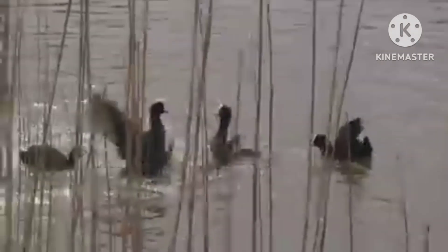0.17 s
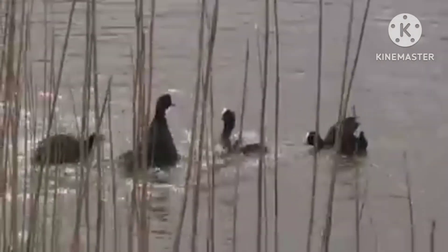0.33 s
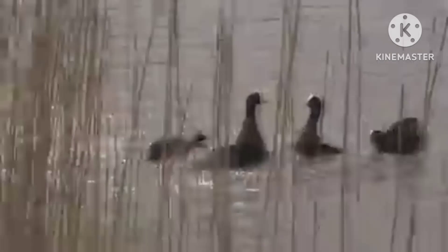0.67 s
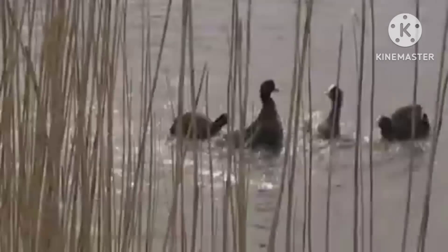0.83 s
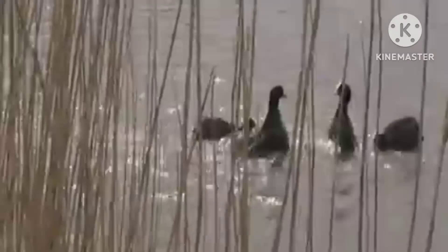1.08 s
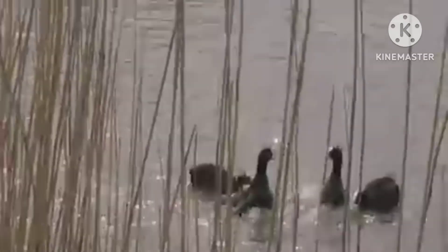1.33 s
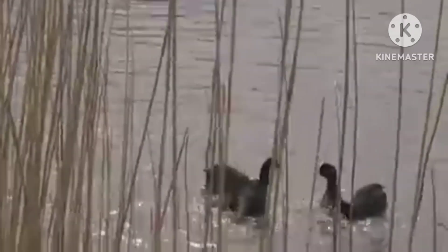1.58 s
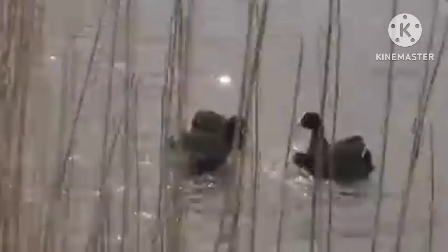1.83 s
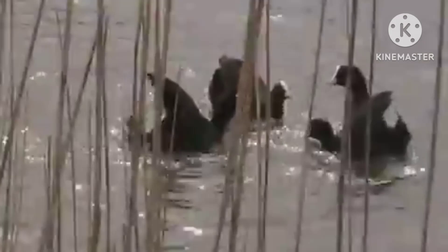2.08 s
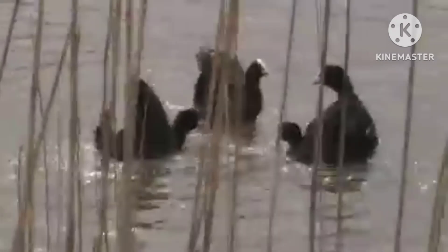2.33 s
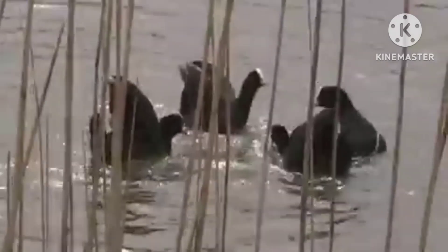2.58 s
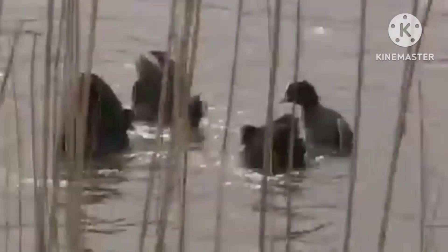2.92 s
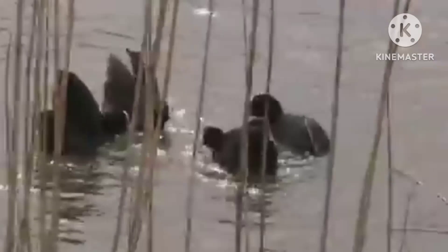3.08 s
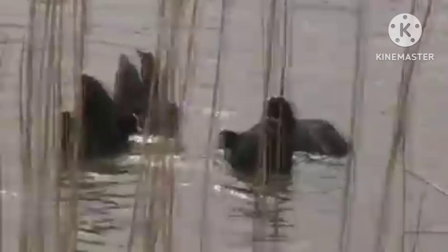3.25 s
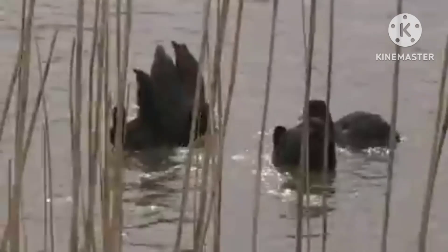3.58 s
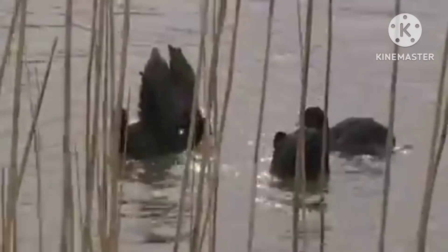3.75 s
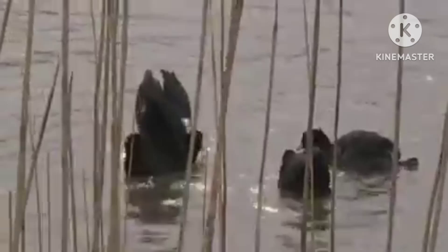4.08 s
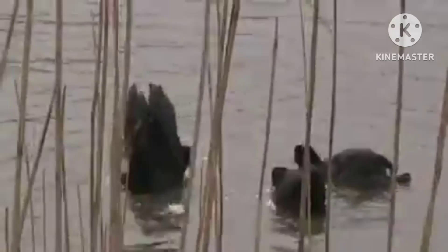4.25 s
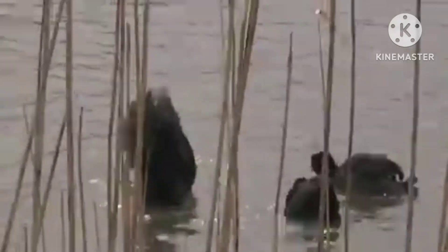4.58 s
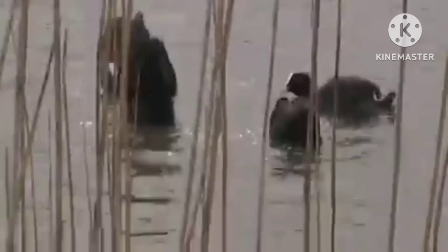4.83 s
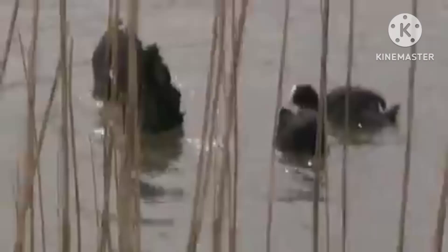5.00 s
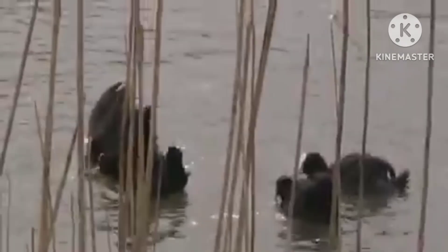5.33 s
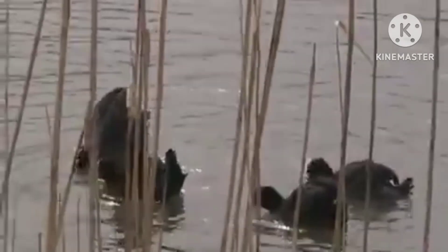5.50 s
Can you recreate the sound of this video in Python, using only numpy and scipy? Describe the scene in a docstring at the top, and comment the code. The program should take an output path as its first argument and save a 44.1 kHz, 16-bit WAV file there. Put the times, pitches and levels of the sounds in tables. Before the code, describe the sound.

Water splashes and trickles for the first second and a half, then mostly settles to a faint hiss. Over it, a piercing bird barks short falling notes, answered by a quieter clear-toned bird and, from the middle on, a rough, catching one. Calls become closer and nearly overlap. Dull far-off rumble and soft wind thumps continue. Open lake, birds fairly close and dry, only a tiny scatter from reeds, background ducking under loud calls.

```python
"""Water stirs and plops over a low distant rumble and lumpy wind; then three coots quarrel behind reeds.
A shrill bird, a stuttering one and a mellow one give short falling calls, built from wavering overtones.
Splashes are short noise bursts, tiny drops are fading tones, and rumble and wind are drifting noise.
Gain control turns everything down with loud calls, so the background dips and soon returns."""
import sys
import numpy as np
from scipy import signal
from scipy.fft import rfft, irfft, next_fast_len
from scipy.io import wavfile
from scipy.ndimage import uniform_filter1d

SR = 44100
rng = np.random.default_rng(int(sys.argv[2]) if len(sys.argv) > 2 else 0)


def ratio(d):
    """dB to gain"""
    e = np.asarray(d, float) / 20
    return 10 ** e


def wav_out(sig):
    """Save sig, one row per channel (or a flat mono array), as 16-bit PCM at SR to the path in sys.argv[1]."""
    wavfile.write(sys.argv[1], SR, np.round(np.clip(np.atleast_2d(sig).T, -1, 1) * 32767).astype(np.int16))


N = 249165  # length in samples

# Colour of the distant rumble: pitch_hz, relative_level_db
RUMBLE_COLOUR = [(88, -60), (150, 1), (270, 6), (674, -7), (779, -2.5), (1340, -12), (1500, -11.5),
                 (1950, -57), (3300, -120)]
# Loudness of the rumble over time: time_s, level_db
RUMBLE_LEVEL = [(0.0, -46.5), (0.93, -39.5), (0.99, -42), (1.23, -38), (2.14, -45), (2.9, -44), (3.6, -44),
                (4.15, -39), (4.7, -40), (5.4, -36), (5.65, -40.5)]
# Wavering bands in the rumble: centre_hz, width_hz, level_db on the scale of the rumble colour
WAVERING_BANDS = [(269.1, 64.5, 10.5), (432.9, 50.6, 5.5)]
# Loudness of the wind over time: time_s, level_db
WIND_LEVEL = [(0.0, -39.5), (1.08, -52.5), (1.68, -44), (1.76, -54.5), (1.93, -34.5), (2.11, -49.5),
              (4.03, -50), (4.31, -41.5), (4.47, -50), (4.56, -33), (5.15, -45.5), (5.57, -39.5),
              (5.65, -24)]
# How alike left and right are in rumble and water: pitch_hz, likeness (-1 to 1)
LIKENESS = [(30, 0.96), (60, 0.9), (130, 1), (240, 1), (500, 0.752), (950, -0.052), (3770, -0.445),
            (15000, 0.18)]
# Colour of the calm lake's hiss: pitch_hz, relative_level_db
CALM_COLOUR = [(350, -38.5), (600, -9), (1470, -17), (2180, -11.5), (2370, -16), (3160, -17.5),
               (13200, -29), (16000, -40.5)]
CALM_DB = -51.5
# Colour of the stirred water and its drops: pitch_hz, relative_level_db
WATER_COLOUR = [(380, -34.5), (650, 1), (1100, -7.5), (1600, 1), (2590, -4), (12200, -16.5), (15200, -14),
                (16000, -58)]
# Stirred water, loudest at first, dying away by 1.75 s with a brief return near 1.4 s: time_s, level_db
STIR_LEVEL = [(0.0, -43), (0.326, -45), (0.798, -48.5), (0.978, -59.5), (1.364, -47.5), (1.534, -56.5),
              (1.75, -88)]
# Short noise bursts: splashes, drops, and two voice clicks just before a call (3.046 and 3.056 s):
# time_s (begins 1 ms sooner), level_db before the fade, centre_hz, fade_s (time to fall 60 dB),
# half_width_octaves
SHORT_BURSTS = [(0.133, -26, 700, 0.032, 0.62), (0.143, -22, 706, 0.05, 0.68),
                (0.153, -26, 2320, 0.0423, 0.85), (0.402, -22.5, 1700, 0.029, 1.63),
                (0.409, -26, 1600, 0.066, 1.81), (0.0205, -34.5, 4010, 0.022, 1.8),
                (0.4844, -30, 3800, 0.026, 1.1), (0.747, -21.5, 2770, 0.0231, 1.49),
                (1.085, -37.5, 3850, 0.048, 4.8), (1.1927, -38.5, 2800, 0.0206, 3.2),
                (1.288, -37.5, 3150, 0.0415, 1.22), (1.5255, -27.5, 8730, 0.0295, 11.7),
                (2.319, -36.5, 7800, 0.0255, 1.05), (2.6679, -27, 3030, 0.0284, 10),
                (3.646, -37.5, 5230, 0.0212, 1.05), (3.7193, -37.5, 8097, 0.0126, 1.3),
                (4.786, -34.5, 6770, 0.0204, 0.33), (1.106, -39.5, 929, 0.017, 0.94),
                (1.145, -32.5, 886, 0.029, 1.34), (1.441, -36, 813, 0.0172, 0.94),
                (2.078, -23, 1930, 0.0273, 0.79), (2.093, -18, 1770, 0.0245, 0.613),
                (2.353, -33, 781, 0.0219, 0.46), (2.871, -33.5, 2090, 0.0248, 0.44),
                (3.046, -29.5, 1790, 0.0365, 0.45), (3.056, -30, 2927, 0.099, 0.52)]

# Calls of the shrill bird: start_s, length_s, effort_db, head_hz, last_hz
SHRILL_CALLS = [(0.361, .06, -16, 1037, 971.4), (0.955, 0.0861, -6, 1144, 985.3),
                (1.731, 0.1007, -4.5, 1158, 977.6), (2.455, 0.0959, -6, 1142, 944.8),
                (3.066, .095, -5, 1088, 909), (3.7994, .12, -4.5, 1145, 888.7),
                (4.425, 0.0924, -6.5, 1080, 911.2), (5.138, 0.0937, -7.5, 1072, 910.2)]
# Calls of the stuttering bird: start_s, length_s, effort_db, head_hz, last_hz
STUTTERING_CALLS = [(2.778, .045, -19.5, 912, 888.7), (3.341, 0.0672, -18, 952.6, 904.8),
                    (4.366, .068, -17.5, 946, 873.3), (4.885, 0.0771, -13, 1021, 876.3),
                    (5.358, 0.0762, -15, 954.6, 863.1)]
# Calls of the mellow bird: start_s, length_s, effort_db, head_hz, widest_beak (0 to 1)
MELLOW_CALLS = [(0.416, 0.0382, -34.5, 767.5, 0.25), (1.308, 0.0673, -13.5, 803.9, 0.5),
                (2.116, 0.054, -31, 769.2, 0.28), (2.659, 0.0664, -29, 772.6, 0.34),
                (3.4, 0.0748, -25.5, 793.1, 0.49), (3.966, 0.0474, -38.5, 765.4, 0.34),
                (4.308, .077, -22.5, 812.4, 0.85), (4.748, 0.0375, -42, 771, 0.7),
                (5.292, 0.087, -21.5, 816.8, 0.78)]
# A whistle-like note, a low grunt and a low plop: start_s, length_s, effort_db, first_hz, last_hz
ODD_NOTES = [(0.466, 0.0537, -24, 1343, 1261), (0.775, .075, -29, 331.8, 263.7),
             (2.352, 0.0215, -31, 358, 378)]
# Moments where a voice catches: time_s, depth_db (before the overtone weighting; negative swells),
# pitch_bend (share of the pitch)
CATCHES = [(0.3681, 18, 0.016), (0.384, 1.5, 0.031), (0.9651, 3.5, -0.078), (0.969, -6, 0.068),
           (0.981, 2.5, 0.038), (1.742, 5.5, -0.0756), (1.746, 2.5, 0.0575), (1.757, -1, 0.0496),
           (2.4646, 3, -0.112), (2.469, 0.5, 0.056), (2.788, 8.5, 0.139), (2.801, 4, 0.146),
           (2.8053, 9, 0.029), (3.0752, 9, -0.11), (3.079, 4.5, 0.071), (3.09, -2, 0.0225),
           (3.352, 15, 0.051), (3.361, 12, 0.119), (3.372, 5, 0.228), (3.383, 11, 0.109), (3.392, 8, 0.028),
           (3.8108, 7.5, -0.098), (3.8165, 4.5, 0.071), (3.846, 9, -0.021), (3.858, 0, 0.05),
           (3.866, -2.5, 0.114), (3.8747, 0.5, 0.0603), (3.894, 5, 0.0165), (4.3747, 11.5, 0.074),
           (4.384, 10.5, 0.072), (4.394, 5, 0.169), (4.407, 2, 0.047), (4.434, 20, -0.072),
           (4.4463, 5, 0.078), (4.4605, 5, 0.017), (4.8963, 9, 0.115), (4.907, 4, 0.14), (4.92, 1, 0.14),
           (4.931, 4, 0.0585), (5.149, 5, -0.114), (5.164, -0.5, 0.054), (5.175, -1.5, 0.026),
           (5.3662, 10.5, 0.063), (5.377, 8, 0.169), (5.386, 4.5, 0.182), (5.398, 4, 0.158)]
# Sound colours, beak open, shut, or for the odd notes: pitch_hz, relative_level_db
SHRILL_OPEN = [(900, -21.5), (1250, -13), (2300, -1), (3500, 4), (4600, -2), (5700, -8), (6900, 0),
               (8100, -8.5), (10000, -16.5), (14000, -36.5)]
STUTTERING_OPEN = [(800, -13.5), (2000, 0), (3000, 8.5), (4000, -2), (5300, -19), (7000, -16),
                   (10000, -24.5), (14000, -41)]
MELLOW_OPEN = [(700, -25), (1550, 3.5), (2400, -16), (3200, -10), (4000, -9.5), (5500, -22), (7000, -19.5),
               (10000, -30.5), (14000, -65)]
SHUT = [(300, -41), (1000, 13.5), (2000, -10.5), (3000, -27.5), (4000, -33), (5000, -47), (6500, -30),
        (9000, -36), (14000, -34)]  # shared by the shrill and stuttering birds
MELLOW_SHUT = [(700, 5), (1550, -5), (2400, -8), (3200, -27.5), (4000, -28), (5500, -58.5), (7000, -39.5),
               (10000, -47)]
WHISTLE_COLOUR = [(1300, 6.5), (2600, -13.5), (3900, -18), (5200, -30.5)]
LOW_COLOUR = [(300, 7), (600, -9), (900, -30.5), (1500, -81)]  # shared by the grunt and the plop
# Course of one call: length_share (0 to 1), effort_db, beak (0 to 1)
SHRILL_SHAPE = [(0, -39, .6), (.03, -19.5, .7), (0.056, -3, 0.91), (.2, -1, 0.89), (.37, -4.5, 0.86),
                (.47, -10.5, 0.6), (.63, -12.5, 0.4), (.82, -17, 0.33), (0.999, -51.5, 0.37)]  # loud head, quiet tail
STUTTERING_SHAPE = [(0, -40.5, 0.29), (.05, -0.5, 0.79), (.3, 0, 0.73), (.5, -1.5, 0.74), (.7, -4.5, .35),
                    (.875, -12.5, 0.26), (0.998, -39.5, 0.43)]
ODD_SHAPE = [(0, -25.5, 0.25), (.4, 0, 0.45), (1, -15.5, .5)]
# Course of one mellow call: length_share (0 to 1), effort_db, share_of_widest_beak (0 to 1)
MELLOW_SHAPE = [(0, -31.5, 0.92), (.09, -3, 0.93), (.45, 0, .85), (.8, -7, .62), (1, -41, 0.68)]
# Front sounds, left over right: pitch_hz, difference_db
LEAN = [(700, 2.5), (2500, 1.5), (5000, -2.5), (8000, -1.5), (12000, 0.5)]
# Front sounds, how far left lags behind right: pitch_hz, lag_radians
LAG = [(700, 0.101), (3000, 0.803), (6000, 1.324), (10000, 0.787), (14000, 1.87)]

# Pitch corners as shares of a call's length; BREAK_HZ is where each shrill call breaks down to
BREAK_FROM, BREAK_TO, BREAK_LANDS, BREAK_HZ = .36, .5, .86, 1017.5
STUTTER_FALLS, STUTTER_LANDS = 0.3726, .72
MELLOW_FALLS, MELLOW_LANDS = 0.1371, 0.98
MELLOW_HOLD_S, SAG_HZ_PER_S = 0.0321, 2235  # the fall grows with the length beyond the hold
FLICK_S, SNAP_S = 0.0029, 0.001626  # pitch slides off, then snaps back
TAIL_FOLLOWS, FULL_DB = 0.465, -6  # the tail follows the head's distance from full effort by this share
RASP, RAGGED = 3.05, 1.2  # extra air noise in the first burst, and as the beak shuts


def evened(x):
    """Scales to rms 1."""
    return x / np.sqrt(np.mean(x ** 2) + 1e-20)


def read(points, hz):
    """Reads a spectrum on a log-frequency axis."""
    f, value = np.transpose(points)
    return np.interp(np.log(hz + 1), np.log(f + 1), value)


def curve(rows):
    """Turns a level curve in dB into a gain for every sample."""
    s, db = np.transpose(rows)
    return ratio(np.interp(np.arange(N) / SR, s, db))


def add(mix, s, sound):
    """Mixes a sound in at s seconds."""
    part = mix[round(s * SR):][:len(sound)]
    part += sound[:len(part)]


def drift(shape, size):
    """Slow random motion of rms 1, smooth over size samples."""
    once = uniform_filter1d(rng.standard_normal(shape), size)
    return evened(uniform_filter1d(once, size))


def coloured(x, gain):
    """Filters x by a complex gain for each frequency."""
    size = next_fast_len(N)
    hz = np.fft.rfftfreq(size, 1 / SR)
    return irfft(rfft(x, size) * gain(hz), size)[..., :N]


def wash(gain, likeness, patchy_db):
    """Two-channel noise of a given colour, with patches drifting over time and frequency."""
    frames, hz = N // 256 + 5, np.fft.rfftfreq(1024, 1 / SR)[:, None]
    a, b, c, d, patches = rng.standard_normal((frames, 513, 5)).T
    patches = uniform_filter1d(patches, size=24, axis=0)  # over frequency
    patches = evened(uniform_filter1d(patches, size=5, axis=1))  # over time
    same = np.clip(likeness(hz), -1, 1)
    left = a + 1j * b
    right = same * left + np.sqrt(1 - same ** 2) * (c + 1j * d)
    z = np.array([left, right]) * gain(hz, frames) * ratio(patchy_db * patches)
    return evened(signal.istft(z, nperseg=1024, noverlap=768)[1][:, :N])


def rumble():
    """Distant low noise with two bands that waver in pitch."""
    def colour(hz, frames):
        """The broad wash plus the moving bands."""
        total = ratio(read(RUMBLE_COLOUR, hz))
        for centre_hz, width_hz, db in WAVERING_BANDS:
            moving_hz = centre_hz * (1 + 0.0955 * drift(frames, size=12))
            total = total + ratio(db) / (1 + ((hz - moving_hz) / (width_hz / 2)) ** 2)
        return total
    return curve(RUMBLE_LEVEL) * wash(colour, lambda hz: read(LIKENESS, hz), patchy_db=1.0)


def wind():
    """Lumpy low buffeting of wind on the microphone, partly unlike at its two ports."""
    def colour(hz, frames):
        """One low hump round 95 Hz."""
        return 1 / (1 + (np.log2((hz + 1) / 95) / 0.456) ** 4)

    def likeness(hz):
        """Left and right differ most near 160 Hz."""
        return .97 - .8 * np.exp(-((hz - 160) / 50) ** 2)
    lumps = ratio(2 * drift(N, size=900))
    return curve(WIND_LEVEL) * lumps * wash(colour, likeness, patchy_db=1.5)


def water():
    """Calm hiss of the lake, under stirred noise and fading drop tones that are loudest at first."""
    t, crackle = np.arange(300) / SR, np.zeros((2, N))
    for hz in np.geomspace(800, 9000, num=14):
        chance = rng.random((2, N)) * SR / 30  # below 1 about 30 times a second
        drops = (chance < 1) * np.clip(chance, .05, 1) ** -.46  # many small, few large
        ring = np.sin(2 * np.pi * hz * t) * np.exp(-t * hz / 6.5)
        drop = ratio(read(WATER_COLOUR, hz)) * ring * hz ** 0.984
        both_sides = drops + 0.6 * drops[::-1]
        crackle += signal.oaconvolve(both_sides, drop[None], axes=1)[:, :N]
    likeness = lambda hz: read(LIKENESS, hz)
    stirred = wash(lambda hz, frames: ratio(read(WATER_COLOUR, hz)), likeness, patchy_db=4.5)
    calm = wash(lambda hz, frames: ratio(read(CALM_COLOUR, hz)), likeness, patchy_db=1.18)
    return curve(STIR_LEVEL) * (stirred + ratio(-5.0) * evened(crackle)) + ratio(CALM_DB) * calm


def short_bursts():
    """Splashes, drops and two voice clicks: short noises, each with its own centre and fade."""
    mix, t, hz = np.zeros(N), np.arange(4096) / SR, np.fft.rfftfreq(4096, 1 / SR)
    for s, db, centre_hz, fade_s, octaves in SHORT_BURSTS:
        noise = rng.standard_normal(4096)
        hump = 1 / (1 + (np.log2((hz + 1) / centre_hz) / max(octaves, .05)) ** 2)
        low_cut = 1 / (1 + (450 / (hz + 1)) ** 4)
        burst = evened(irfft(rfft(noise) * hump * low_cut))
        burst *= (1 - np.exp(-t / 0.000403)) * ratio(-60 * t / max(fade_s, .003))
        add(mix, s - .001, ratio(db) * burst)
    return mix


def phrase(start, length, effort_db, shape, bends, pitches, beak=1, lift_db=0):
    """Stretches a shape over one call: rows of time_s, pitch_hz, effort_db, beak (0 to 1)."""
    share, db, opening = np.transpose(shape)
    at = np.union1d(share, bends)
    effort = effort_db + np.interp(at, share, db)
    effort += np.interp(at, bends[:2], [0, lift_db])  # shifts the tail only
    pitch = np.interp(at, bends, pitches)
    width = np.clip(beak * np.interp(at, share, opening), 0, 1)
    return np.transpose([start + length * at, pitch, effort, width])


def call(rows, throat, shut, jitter, breath_db):
    """A voice of 14 harmonics, rough at its start, whose colour changes as the beak shuts."""
    s, *columns = np.transpose(rows)
    t = np.arange(s[0], s[-1], 1 / SR)
    age = t - s[0]
    columns[1] = ratio(columns[1] / 2)  # air pressure moves in straight lines, the sound goes with its square
    hz, pressure, beak = (np.interp(t, s, c) for c in columns)

    at, depth_db, bend = (c[:, None] for c in np.transpose(CATCHES))
    away = (t - at) / (0.001105 + .00008 * depth_db)  # deeper catches last longer
    dip = np.exp(-np.where(away < 0, away ** 2, away ** 4))  # the voice fades out, then snaps back
    catch_db = (depth_db * dip).sum(0)
    flick = (bend * np.exp(-((t - at) / np.where(t < at, FLICK_S, SNAP_S)) ** 2)).sum(0)

    burst = np.exp(-age / 0.01264)  # the air bursts out sharp and unsteady
    wobble = jitter * (beak + 2.006 * burst) * drift(len(t), size=40)
    turns = np.cumsum(hz * (1 + flick + 4.33 * jitter * burst ** 3 + wobble)) / SR

    k = np.arange(1, 15)[:, None]  # harmonic number
    colour_db = beak * read(throat, k * hz) + (1 - beak) * read(shut, k * hz)
    heights = ratio(colour_db) * (k * hz < SR / 2)
    heights *= ratio(-.02 * age * np.maximum(k * hz - 4500, 0))  # the top overtones tire first

    def flutter(size):
        """Complex drift, separate for each harmonic."""
        return drift((len(k), len(t)), size) + 1j * drift((len(k), len(t)), size)
    # air noise smears the upper partials most
    breathy = ratio(breath_db) * (k - .7) ** 0.784 * (1 + RASP * burst + RAGGED * (1 - beak))
    air = breathy * flutter(24)
    air += 13.1 * jitter * (k > 1) * flutter(130)  # overtones wax and wane singly
    spread = np.exp(.02j * k ** 2)  # the windpipe spreads each pulse a little in time
    # a catch mutes the overtones more than the fundamental
    caught = ratio(-catch_db * np.minimum(0.78 + 0.315 * k, 1.2))
    partials = heights * caught * (1 + air) / np.sqrt(1 + 2 * breathy ** 2)
    voice = (partials * spread * np.exp(2j * np.pi * k * turns)).imag.sum(0)
    return s[0], voice * pressure ** 2 / np.sqrt((heights ** 2).sum(0) / 2)


def odd_notes(mix):
    """A whistle-like note, a low grunt and a low plop: harmonic tones, each of one fixed colour."""
    colours = (WHISTLE_COLOUR, LOW_COLOUR, LOW_COLOUR)
    for (s, length, db, hz, last), colour in zip(ODD_NOTES, colours):
        rows = phrase(s, length, db, ODD_SHAPE, [0, .6], [hz, last])
        add(mix, *call(rows, colour, colour, jitter=0.0049, breath_db=-21.5))


def mellow_bird(mix):
    """Steady, clear calls; the longer the call, the further its pitch falls."""
    for s, length, db, hz, beak in MELLOW_CALLS:
        last = hz - SAG_HZ_PER_S * max(length - MELLOW_HOLD_S, 0)
        rows = phrase(s, length, db, MELLOW_SHAPE, [MELLOW_FALLS, MELLOW_LANDS], [hz, last], beak)
        add(mix, *call(rows, MELLOW_OPEN, MELLOW_SHUT, jitter=0.00497, breath_db=-36.5))


def stuttering_bird(mix):
    """Falling calls whose voice catches again and again."""
    for s, length, db, hz, last in STUTTERING_CALLS:
        rows = phrase(s, length, db, STUTTERING_SHAPE, [STUTTER_FALLS, STUTTER_LANDS], [hz, last])
        add(mix, *call(rows, STUTTERING_OPEN, SHUT, jitter=0.0171, breath_db=-24))


def shrill_bird(mix):
    """Shrill calls hold their pitch, break downward, then slide to a quiet end."""
    for s, length, db, hz, last in SHRILL_CALLS:
        rows = phrase(s, length, db, SHRILL_SHAPE, [BREAK_FROM, BREAK_TO, BREAK_LANDS],
                      [hz, min(BREAK_HZ, hz), last], lift_db=(1 - TAIL_FOLLOWS) * (FULL_DB - db))
        add(mix, *call(rows, SHRILL_OPEN, SHUT, jitter=0.01698, breath_db=-27.5))


def harmonic_sounds():
    """The calls of all three birds and the odd notes together."""
    mix = np.zeros(N)
    for source in (odd_notes, mellow_bird, stuttering_bird, shrill_bird):
        source(mix)
    return mix


def placed(x):
    """The two microphone ports differ in colour and timing; reeds scatter a short tail."""
    def port_gain(hz):
        """Half the difference goes to the left, the opposite half to the right."""
        half = ratio(read(LEAN, hz) / 2) * np.exp(-.5j * read(LAG, hz))
        return half ** np.array([[1], [-1]])
    direct = coloured(x, port_gain)
    t = np.arange(SR // 3) / SR
    echoes = rng.choice([-1., 1.], (2, len(t))) * (rng.random((2, len(t))) < .05)  # sparse clicks
    tail = echoes * ratio(-60 * t / 0.1461) * (t > .004)
    tail /= np.linalg.norm(tail[0])
    return direct + ratio(-14.5) * signal.oaconvolve(x[None], tail, axes=1)[:, :N]


def scene():
    """The wide background behind, short bursts and birds in front."""
    return rumble() + wind() + water() + placed(short_bursts() + harmonic_sounds())


def top_cut(x):
    """Nothing passes above the cut-off."""
    return signal.sosfilt(signal.butter(12, 16500, fs=SR, output="sos"), x)


def record(dry):
    """Microphone band edges, then gain control that falls with loud calls and soon recovers."""
    def band_edges(hz):
        """Cuts below 45 Hz and above 15300 Hz."""
        return hz ** 2 / (hz ** 2 + 45 ** 2) / (1 + (hz / 15300) ** 30)
    heard = coloured(dry, band_edges)
    power = abs(uniform_filter1d((heard ** 2).mean(0), size=600))
    power_db = 10 * np.log10(power + 1e-12)
    recovery = np.arange(N) * 60. / SR  # the held level sinks 60 dB a second
    held_db = np.maximum.accumulate(power_db + recovery) - recovery
    over_db = np.maximum(held_db + 15.5, 0)  # what lies above -15.5 dB
    late = 0.0129 * SR  # the gain answers late, in samples
    late_db = signal.lfilter([1 / late], [1, 1 / late - 1], over_db)
    finished = np.clip(heard / ratio(1.067 * late_db), -1, 1)
    return top_cut(finished)


dry = scene()
out = record(dry)
wav_out(out)
```